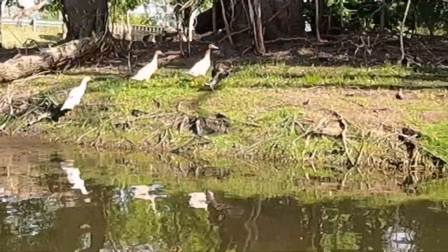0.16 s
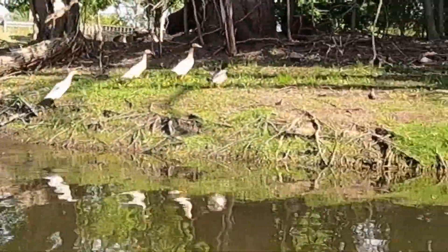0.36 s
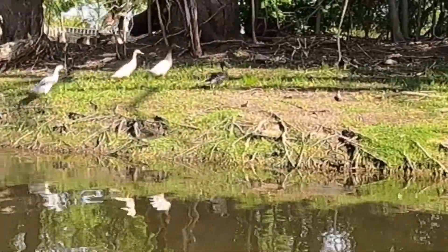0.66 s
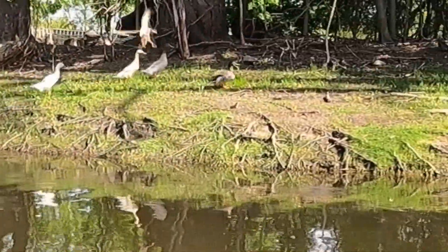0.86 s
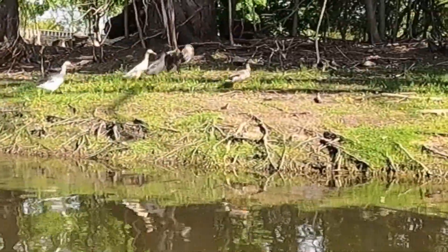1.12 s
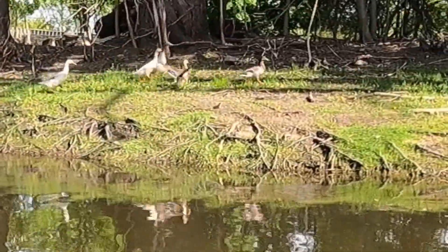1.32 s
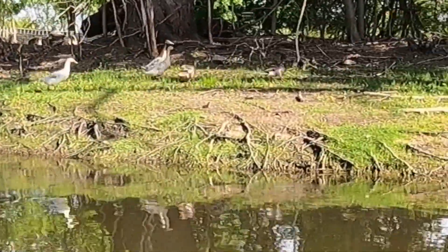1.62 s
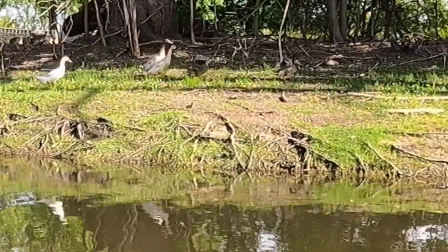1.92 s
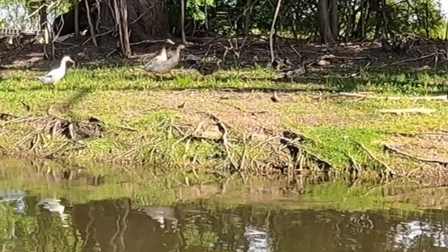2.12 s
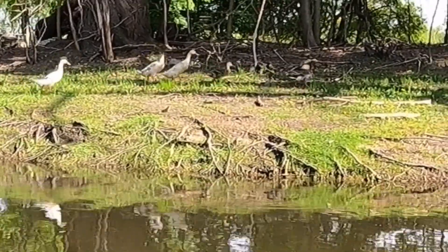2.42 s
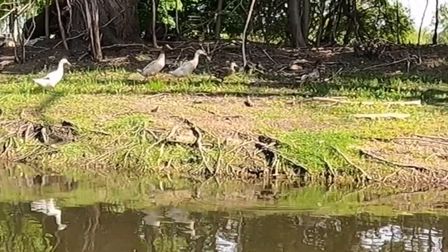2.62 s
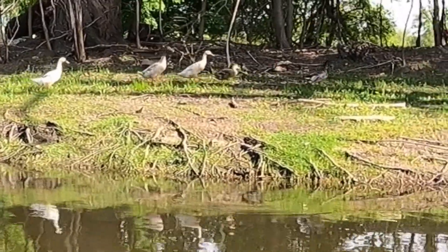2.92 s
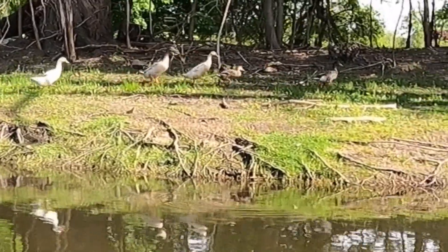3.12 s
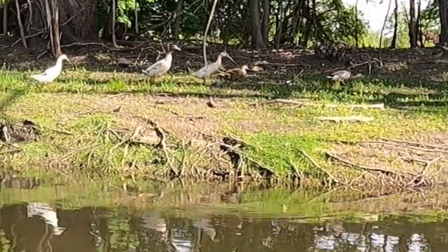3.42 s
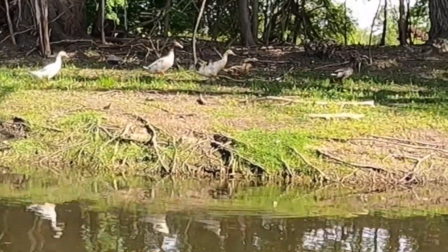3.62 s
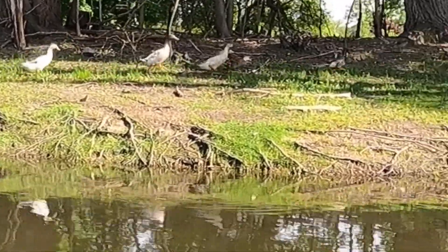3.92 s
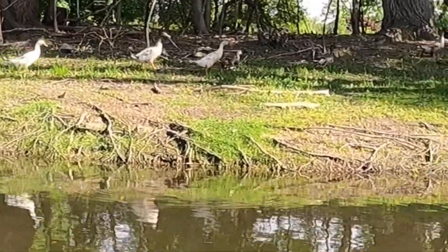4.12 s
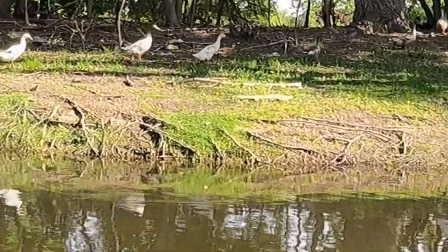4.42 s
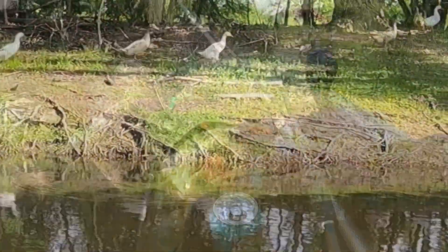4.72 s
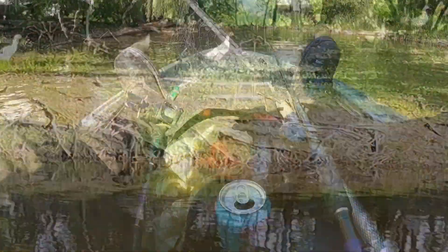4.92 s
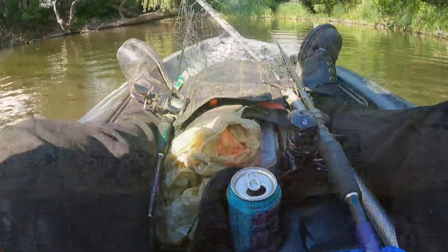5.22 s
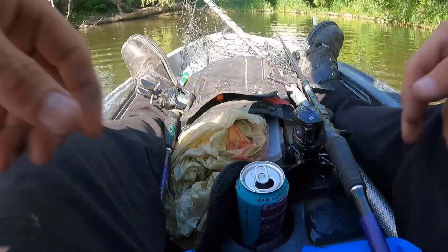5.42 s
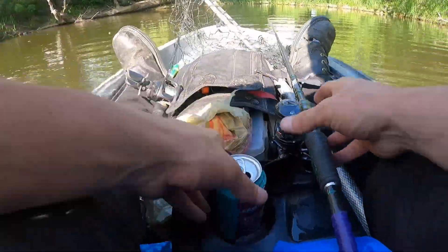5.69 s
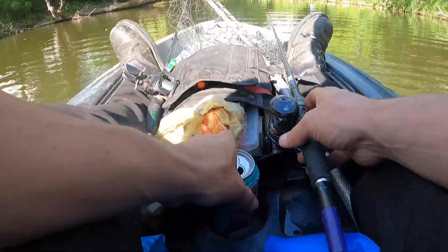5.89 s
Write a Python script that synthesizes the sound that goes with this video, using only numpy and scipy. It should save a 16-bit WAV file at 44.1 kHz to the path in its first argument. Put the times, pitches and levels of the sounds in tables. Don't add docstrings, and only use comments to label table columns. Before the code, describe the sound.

Slow raspy duck calls and soft quacks over low wind and a distant engine, giving way to hollow hull knocks and handling noises in a small boat.

```python
import sys
import numpy as np
from scipy import signal
from scipy.fft import rfft, irfft
from scipy.io import wavfile
from scipy.ndimage import uniform_filter1d

SR = 44100
rng = np.random.default_rng(int(sys.argv[2]) if len(sys.argv) > 2 else 0)


def how_loud(loudness_db):
    steps = np.asarray(loudness_db, float) / 20
    return 10 ** steps


def file_out(sig):
    cols = np.atleast_2d(sig).T
    lim = np.clip(cols, -1, 1)
    pcm = np.round(lim * 32767).astype(np.int16)
    wavfile.write(sys.argv[1], SR, pcm)


N = 266995

FADE_START_S, FADE_END_S = 4.37, 5.08
HANDS_S = 5.14

# (frequency [Hz], level [dB])
BANK_ENGINE = [(42, -48), (54, -51.5), (83, -42.5), (115, -57.5), (126, -53), (146, -57), (168, -61)]
# (frequency [Hz], level [dB])
BOAT_ENGINE = [(38, -40.5), (77, -42.5), (180, -51.5), (202, -49)]
# (time [s], level [dB])
GUSTS = [(0.0, -41), (0.85, -44.5), (1.21, -40.5), (1.79, -48), (2.52, -45.5), (3.6, -48), (4.45, -49),
         (4.65, -42), (4.94, -40), (5.11, -44.5), (5.224, -40), (5.63, -39.5), (6.054, -34.5)]
# (time [s], level [dB])
TREE_BREEZE = [(0.0, 5.5), (0.5, 0.5), (1.35, -1), (2.2, -3.5), (2.9, -0.5), (3.3, 0), (3.65, -2.5),
               (4.1, -2.5), (4.6, 1.5), (5.1, 0.5), (5.27, 3), (5.45, 0.5), (5.6, 3.5), (5.8, -0.5),
               (6.05, 1)]
# (frequency [Hz], density [dB per Hz])
BANK_SPECTRUM = [(12, -50), (20, -19), (60, -1), (85, -7), (106, -6), (324, -19.5), (425, -29.5),
                 (1490, -26.5), (2070, -32.5), (2800, -31.5), (3300, -38), (6350, -44), (8110, -53.5),
                 (10400, -54), (13000, -64.5), (15500, -84)]
# (frequency [Hz], density [dB per Hz])
BOAT_SPECTRUM = [(12, -26), (20, -12.5), (80, 1), (103, -14), (193, -6.5), (307, -15), (403, -19),
                 (590, -26), (1530, -28.5), (3680, -37.5), (6010, -40.5), (7680, -46.5), (13000, -58.5),
                 (15500, -84)]
# (frequency [Hz], density [dB per Hz])
CLOTH_SPECTRUM = [(1470, -49), (2500, -8), (3160, -0.5), (3800, -29), (4410, -1.5), (6070, 1), (12100, -25),
                  (15000, -46)]
# (loudest time [s], level [dB])
CLOTH_STROKES = [
    (5.16, -62),
    (5.27, -60),
    (5.586, -45),
    (5.69, -63),
    (5.772, -38.5),
    (6.06, -60),
]
# (frequency [Hz], correlation [0-1])
PORT_LIKENESS = [(25, 0.95), (60, 0.99), (140, 0.99), (260, 0.97), (520, 0.85), (1520, 0.75), (4480, 0.77),
                 (13200, 0.67)]
# (frequency [Hz], left lead [rad], left minus right [dB])
PORT_DIFFERENCE = [(100, -0.1, -0.2), (800, -0.013, 1.5), (1860, -0.34, 1), (2900, -1.39, 1),
                   (4200, -0.86, -1), (4400, -0.012, -1.5), (9300, -0.61, 3), (12900, -1.6, 3.5)]

# (time [s], peak [dB], ring [Hz], left minus right [dB], length [ms])
TWIG_TICKS = [(0.084, -45, 5360, -4, 5.7), (0.186, -45, 5600, 0.0, 2.6), (0.342, -45.5, 6040, -1, 3.6),
              (0.434, -35, 6330, 1.0, 1.6), (0.5507, -44, 5570, -1, 1.67), (0.718, -48, 6690, 3, 16),
              (0.724, -43.5, 3700, -4, 10), (2.884, -48, 11800, -2, 1.6), (1.3882, -53, 5200, -0.5, 2.4),
              (1.4093, -45, 6140, -2, 1.8), (2.065, -47, 4560, 4, 2), (2.3111, -45, 6300, 2, 1.3),
              (2.724, -39, 5230, -1, 2.4), (2.905, -43.5, 6360, 4, 2), (2.9926, -45, 5330, -1, 2.5),
              (3.14, -47.5, 3200, 4, 20), (3.171, -47, 3600, 6, 5.2), (3.3204, -50, 4950, -2, 2.1),
              (3.712, -42, 4870, -3, 1.2), (3.824, -36.5, 6740, -1, 1.2), (4.203, -40, 4540, -9, 1.5),
              (4.363, -31.5, 6000, -3, 1.44), (4.423, -40.5, 5600, 0, 1.9)]
# (time [s], peak [dB], ring [Hz])
LEAF_DRIPS = [(0.2404, -49, 7100), (0.2778, -44, 5330), (0.447, -46, 7500), (0.5786, -56, 7000),
              (0.6694, -58, 8500), (0.8355, -55, 8000), (1.3493, -58, 7000), (1.6167, -57, 8000),
              (1.6327, -51, 8100), (1.6576, -53, 8100), (2.3225, -51, 5200), (2.4339, -58, 8000),
              (2.5237, -60, 8000), (2.9622, -53, 8000), (3.0609, -55, 8000), (3.456, -45, 6500),
              (3.5279, -57, 8000), (3.6341, -46, 7000), (3.7688, -49, 7360), (4.214, -48, 5000),
              (4.2807, -54, 9000), (4.473, -55, 9000), (4.54, -58, 9000), (4.591, -62, 8000),
              (4.6344, -53, 9000), (4.695, -52, 10000), (5.4391, -46, 4660), (5.708, -37, 8800),
              (5.988, -42, 10500)]
# (time [s], peak [dB], ring [Hz], left minus right [dB], length [ms])
TACKLE_CLICKS = [
    (5.235, -41, 4400, -11, 5.6),
    (5.264, -38, 5530, -9, 1.7),
    (5.651, -35, 5770, -6, 2),
    (5.668, -22, 6870, 0, 1.2),
    (5.925, -35, 4640, -2, 2.3),
    (5.9446, -42, 5780, -1, 1.47),
    (5.98, -38, 4870, 4, 1.2),
    (5.9994, -39.5, 5000, 2.0, 2.5),
    (5.687, -34, 1460, -7, 1.6),
    (5.9243, -25.5, 1610, -3, 1.7),
]
# (time [s], peak [dB], swing [Hz])
HULL_BLOWS = [
    (2.067, -22, 154),
    (4.683, -20, 83),
    (4.939, -42, 69.7),
    (5.236, -11.5, 77),
    (5.518, -21, 59),
    (5.547, -17, 62.7),
    (5.566, -7.5, 72),
]
# (time [s], peak [dB], ring [Hz])
GEAR_KNOCKS = [(4.851, -42, 258), (4.95, -36, 221), (4.96, -43, 555), (5.055, -38, 307),
               (5.191, -36.5, 244), (5.245, -39, 422), (5.272, -40, 416), (5.328, -38, 400),
               (5.368, -43, 380), (5.49, -39, 414), (5.538, -36, 400), (5.736, -38, 297), (5.858, -43, 230),
               (5.911, -37, 249)]

# (start [s], length [s], centre [Hz],
# level [dB], loudest at [share of length])
CHATTER = [(0.2, 0.095, 2970, -54, 0.32), (0.356, .04, 3900, -60, .4), (0.362, .03, 5500, -65, .4),
           (0.455, 0.046, 1050, -50, .4), (0.99, .04, 3320, -50, .5), (0.841, .2, 3930, -52, 0.35),
           (1.46, .22, 4220, -53, 0.38), (1.519, 0.22, 2700, -53, .3), (2.255, 0.035, 3900, -65, .5),
           (2.338, 0.15, 2700, -53.5, 0.62), (2.43, 0.18, 2580, -53, 0.27), (2.79, 0.12, 4400, -58, .4),
           (3.391, 0.058, 4100, -57.5, 0.45), (3.828, 0.33, 3120, -53.5, .4), (4.24, .1, 10000, -71.5, .55),
           (4.27, .06, 6940, -64.5, .5)]
# (start [s], length [s], centre [Hz], level [dB], loudest at [share of length])
WARBLES = [(0.845, 0.2, 3650, -49.5, 0.4), (1.0, 0.25, 3720, -53, 0.15), (1.074, 0.17, 2390, -52.5, 0.58),
           (0.831, 0.14, 4180, -51.5, .4), (1.499, 0.14, 4200, -58, 0.31), (1.47, 0.22, 3800, -65, 0.44),
           (1.8, 0.38, 4226, -48, 0.36), (2.238, 0.26, 3930, -66.5, 0.42), (2.714, 0.24, 3940, -58, 0.41),
           (2.761, 0.23, 4460, -64, 0.33), (2.9, 0.12, 6400, -63, 0.26), (3.826, 0.34, 2930, -47.5, 0.4),
           (4.332, 0.27, 3584, -49, 0.41)]
# (start [s], length [s], pitch [Hz], level [dB], loudest
SWELLING_PEEPS = [(0.354, 0.21, 2000, -49.5, 0.047), (1.857, 0.2, 6340, -67, .13),
                  (2.295, 0.33, 2930, -51, 0.067), (2.778, 0.21, 3020, -46, .04),
                  (2.985, 0.15, 5090, -63.5, 0.76), (3.762, 0.28, 7300, -68, .05),
                  (4.084, 0.16, 1923, -53.5, 0.37), (4.734, 0.18, 3913, -49.5, 0.49),
                  (1.259, 0.038, 695, -52.5, 0.35), (3.545, 0.039, 688, -55, 0.41),
                  (4.691, 0.028, 565, -46, 0.46)]
# (start [s], length [s], from [Hz], to [Hz], level [dB])
SLURRED_WHISTLES = [(0.255, 0.071, 2480, 2364, -50), (0.325, .33, 2390, 2325, -53),
                    (0.777, 0.2, 4519, 4414, -55.5), (0.802, 0.049, 4383, 3470, -51),
                    (1.442, 0.03, 3600, 4030, -56.5), (1.453, 0.016, 4050, 5000, -53),
                    (1.504, 0.21, 2950, 2870, -53.5), (2.326, 0.0545, 2794, 2425, -50),
                    (3.315, 0.0614, 2446, 2710, -51.5), (3.357, 0.16, 2740, 2646, -49.5),
                    (3.329, 0.12, 1660, 1703, -56)]

# (start [s], length [s], effort [dB], pulse rate [Hz], throat [Hz])
LOW_QUACKS = [
    (0.498, 0.027, -43.5, 152, 1120),
    (0.681, 0.014, -42.5, 136, 1120),
    (1.055, 0.045, -43.5, 145, 1150),
    (1.367, 0.061, -42.5, 150, 1105),
    (2.594, 0.026, -48.5, 172, 930),
    (2.748, 0.037, -44, 200, 1110),
    (2.95, 0.02, -60, 120, 800),
    (3.025, 0.033, -45, 153, 1120),
    (3.37, 0.072, -48, 172, 900),
]
# (frequency [Hz], width [Hz], level [dB])
QUACK_RESONANCES = [(400, 130, -13.5), (673, 210, -5.5), (1345, 290, -6.5), (3800, 1200, -23.5)]
# (start [s], length [s], effort [dB], bill opening [dB])
SHORT_GRUNTS = [(0.0, 0.05, -42.5, -26), (0.621, 0.07, -49, -32), (0.709, 0.043, -46, -16),
                (1.299, 0.081, -46.5, -20), (1.518, 0.14, -42, -19), (2.172, 0.073, -44, -26),
                (2.4, 0.097, -39.5, -10.5), (3.006, 0.066, -41, -16.5), (3.218, 0.093, -38, -16),
                (3.943, 0.088, -37.5, -19), (4.172, 0.092, -37.5, -18.5), (4.805, 0.066, -48, -28),
                (5.026, 0.075, -49.5, -27)]
# (frequency [Hz], width [Hz], level [dB])
THROAT_RESONANCES = [(1771, 160, -2.5), (2100, 308, 1.5)]
# (frequency [Hz], width [Hz], level [dB])
BILL_RESONANCES = [(2784, 214, 3), (4580, 300, -19.5), (5370, 1000, -14), (6570, 580, -24)]
# (time [s], effort [dB], bill opening [dB], throat [Hz])
OTHER_DRAKE = [
    (0.045, -52, -4, 1900),
    (0.09, -48.5, -8.5, 2210),
    (0.18, -43, -8, 2330),
    (0.2, -46.5, -5, 2410),
    (0.24, -66, -15, 2450),
]
# (start [s], length [s], effort [dB], loudest at [share of length], throat [Hz])
LONG_RASPS = [
    (0.736, 0.34, -40.5, 0.41, 2103),
    (1.618, 0.31, -37, 0.51, 2095),
    (2.537, 0.32, -38.5, 0.43, 2100),
    (3.425, 0.37, -38, 0.46, 2125),
    (4.32, 0.36, -41, 0.62, 2134),
]


def evened(x):
    return x / np.sqrt(np.mean(x ** 2) + 1e-20)


def smooth_noise(count, window):
    return evened(uniform_filter1d(rng.standard_normal(count), window))


def read(points, hz):
    f, value = np.transpose(points)
    return np.interp(np.log(hz + 1), np.log(f + 1), value)


def columns(rows):
    s, *cols = np.transpose(rows)
    t = np.arange(s[0], s[-1], 1 / SR)
    return (t, *(np.interp(t, s, c) for c in cols))


def add(mix, s, sound):
    part = mix[..., round(s * SR):][..., :sound.shape[-1]]
    part += sound[..., :part.shape[-1]]


def panned(db):
    return how_loud([[db / 2], [-db / 2]])


def resonate(x, hz, width):
    turn = np.exp(2j * np.pi * np.cumsum(hz * np.ones(len(x))) / SR)
    r = np.exp(-np.pi * width / SR)
    return 2 * (turn * signal.lfilter([(1 - r) ** 2], [1, -2 * r, r * r], x / turn)).real


def boat_share(t):
    return np.clip((t - FADE_START_S) / (FADE_END_S - FADE_START_S), 0, 1)


def hum(lines):
    out = 0
    for hz, db in lines:
        sway, drift = (evened(resonate(rng.standard_normal(N), 1e-3, 6.77)) for _ in range(2))
        tone = np.sin(2 * np.pi * np.cumsum(hz + 1.278 * drift) / SR)
        out = out + how_loud(db + 2.5 + 2.3 * sway) * tone
    return out


def engine(lines):
    return hum(lines) + how_loud(-19.5) * hum(lines) * np.array([[1], [-1]])


def rustle_db(t):
    rise_db_s, fall_db_s, hands_db = 242, 120, -58
    power = how_loud(2 * hands_db) * (t > HANDS_S) + 1e-14
    for s, db in CLOTH_STROKES:
        power = power + how_loud(2 * (db - np.maximum(rise_db_s * (s - t), fall_db_s * (t - s))))
    return 10 * np.log10(power)


def air():
    frames, hz = N // 256 + 5, np.fft.rfftfreq(1024, 1 / SR)
    t = np.arange(frames) * 256 / SR
    a, b, c, d, patches = rng.standard_normal((5, len(hz), frames))
    patches = evened(uniform_filter1d(uniform_filter1d(patches, 12, 0), 10, 1))
    flicker = smooth_noise(frames, 3) * np.clip(hz / 8000, 0, 1)[:, None]
    boat = boat_share(t)
    shape = how_loud(read(BANK_SPECTRUM, hz)[:, None] * (1 - boat) + read(BOAT_SPECTRUM, hz)[:, None] * boat)

    def gain_db(db, lo, hi, form):
        return db - 10 * np.log10((form[(hz > lo) & (hz < hi)] ** 2).sum(0))

    near = np.clip((t - FADE_START_S) / (HANDS_S - FADE_START_S), 0, 1) ** 3
    breeze_db = np.interp(t, *np.transpose(TREE_BREEZE))
    wash_db = -56 + 9 * near + breeze_db
    leaf_db = -78.5 - 3 * near + 0.89 * breeze_db
    cloth_db = rustle_db(t)
    hiss_db = 10 * np.log10(how_loud(2 * leaf_db) + how_loud(2 * (cloth_db - 18.5)))
    gust = gain_db(np.interp(t, *np.transpose(GUSTS)), 95, 330, shape)
    wash = gain_db(wash_db, 350, 1360, shape)
    hiss = gain_db(hiss_db, 8570, 11300, shape)
    low = 1 / (1 + (hz / 330) ** 4)[:, None]
    high = 1 / (1 + (4000 / (hz + 1)) ** 4)[:, None]
    field = shape * how_loud(low * (gust - 2.5) + high * hiss + (1 - low - high) * wash)
    cloth = how_loud(read(CLOTH_SPECTRUM, hz))[:, None]
    field = np.hypot(field, cloth * how_loud(gain_db(cloth_db, 4800, 9000, cloth) - 8.5))
    same, left = read(PORT_LIKENESS, hz)[:, None], a + 1j * b
    z = np.array([left, same * left + np.sqrt(1 - same ** 2) * (c + 1j * d)])
    z *= field * how_loud(1.9 * patches + 2.53 * flicker + 1.0)
    return signal.istft(z, nperseg=1024, noverlap=768)[1][:, :N]


def crackle():
    t = np.arange(HANDS_S, N / SR, 1 / SR)
    snaps = (rng.random((2, len(t))) < 60 / SR) * rng.standard_normal((2, len(t)))
    bright = signal.lfilter(*signal.butter(2, (4000, 13000), "band", fs=SR), snaps)
    out = np.zeros((2, N))
    add(out, t[0], how_loud(rustle_db(t) - 20) * evened(bright))
    return out


def ticks():
    out, t = np.zeros((2, N)), np.arange(1500) / SR
    bright = signal.butter(2, (3500, 12500), "band", fs=SR)
    drips = [(*drip, -1, 1.5) for drip in LEAF_DRIPS]
    for s, db, hz, pan_db, ms in [*TWIG_TICKS, *TACKLE_CLICKS, *drips]:
        noise = rng.standard_normal(len(t))
        burst = evened(resonate(noise, hz, 1900)) + 0.32 * signal.lfilter(*bright, noise)
        envelope = np.exp(-1000 * t / max(ms, .3)) * np.tanh(t / 0.00041)
        add(out, s, how_loud(db - 6) * burst * envelope * panned(pan_db))
    return out


def hull():
    out, t = np.zeros((2, N)), np.arange(SR // 5) / SR
    for s, db, hz in HULL_BLOWS:
        add(out, s, how_loud(db - 2.5) * np.sin(2 * np.pi * hz * t) * t * hz * np.exp(1 - 2.33 * t * hz))
    for s, db, hz in GEAR_KNOCKS:
        swing = t * hz / 1.7
        add(out, s, how_loud(db) * np.sin(2 * np.pi * hz * t) * swing * np.exp(1 - swing))
    return out


def wood(x):
    t = np.arange(SR // 3) / SR
    tail = rng.standard_normal((2, len(t))) * how_loud(-60 * t / 0.26) * (t > .004)
    return signal.fftconvolve(x, tail / np.linalg.norm(tail[0]), axes=1)[:, :N]


def calls(voice, rule, table, pan_db):
    out = np.zeros(N)
    for row in table:
        add(out, *voice(rule(*row)))
    return out * panned(pan_db)


def swell(start, length, hz, db, share):
    return np.c_[start + length * np.array([0, share, 1]), [hz] * 3, db + np.array([-14, 0, -22.5])]


def held(start, length, db, attack_s, release_s, edge_db):
    s = start + np.array([0, attack_s, (length + attack_s - release_s) / 2, length - release_s, length])
    return s, db + edge_db * np.array([1, 0, 0, 0, 1])


def slur(start, length, from_hz, to_hz, db):
    s, level_db = held(start, length, db, attack_s=0.012, release_s=0.012, edge_db=-3)
    done = np.interp((s - start) / length, [0, .5, 1], [0, .8, 1])
    return np.c_[s, from_hz + (to_hz - from_hz) * done, level_db]


def buzz(rows):
    t, hz, level_db = columns(rows)
    breath = evened(resonate(rng.standard_normal(len(t)), hz, 300 + 0.085 * hz.mean()))
    return t[0], how_loud(level_db) * breath * signal.windows.tukey(len(t), .15)


def trill(rows):
    t, hz, level_db = columns(rows)
    hz = hz * (1 + .008 * smooth_noise(len(t), 2500))
    line, wide = (evened(resonate(rng.standard_normal(len(t)), hz, width)) for width in (70, 480))
    return t[0], how_loud(level_db) * evened(line + .9 * wide) * signal.windows.tukey(len(t), .15)


def whistle(rows):
    t, hz, level_db = columns(rows)
    waver = smooth_noise(len(t), 900)
    hz = hz * (1 + .005 * waver)
    tone = how_loud(2.4 * waver[::-1]) * np.sqrt(2) * np.sin(2 * np.pi * np.cumsum(hz) / SR)
    blur = evened(resonate(rng.standard_normal(len(t)), hz, 137))
    return t[0], how_loud(level_db) * evened(tone + .75 * blur) * signal.windows.tukey(len(t), .15)


def tract(x, modes):
    return sum(how_loud(db) * evened(resonate(x, hz, width)) for hz, width, db in modes)


def pulses(rate, jitter, uneven_db):
    wander = smooth_noise(len(rate), 300)
    turns = np.cumsum(rate * (1 + jitter * wander)) / SR + .8
    size = how_loud(uneven_db * rng.standard_normal(200))[turns.astype(int)]
    clicks = np.diff(np.floor(turns), prepend=0.)
    puffs = np.exp(-(turns % 1) / .3) * rng.standard_normal(len(rate))
    return size * evened(clicks), size * evened(puffs)


def short_quack(start, length, db, rate, hz):
    s, effort_db = held(start, length, db, attack_s=0.0093, release_s=0.0046, edge_db=-2.5)
    return np.c_[s, effort_db, rate + 0 * s, hz + 0 * s]


def quack(rows):
    t, effort_db, rate, throat_hz = columns(rows)
    clicks, puffs = pulses(rate, jitter=.02, uneven_db=1.5)
    drive = clicks + .35 * puffs
    soft = signal.lfilter(*signal.butter(2, (270, 1900), "band", fs=SR), drive)
    voice = evened(resonate(soft, throat_hz, 370))
    voice = voice + tract(soft, QUACK_RESONANCES[:3]) + tract(drive, QUACK_RESONANCES[3:])
    return t[0], how_loud(effort_db) * evened(voice) * signal.windows.tukey(len(t), .45)


def grunt(start, length, db, bill_db):
    peak, hold = .42, 0.24
    s = start + length * np.array([0, peak - hold / 2, peak + hold / 2, 1])
    effort_db = db - 2 + np.array([-15.5, 0, 0, -22.5])
    return np.c_[s, effort_db, [bill_db] * 4, (2120, 2020, 2080, 2080)]


def long_rasp(start, length, db, share, hz):
    release_s, stop_s, throat_rise_hz = 0.053, 0.015, 180
    cut = start + length - release_s
    s = np.array([start, start + share * length, cut, cut + stop_s, start + length])
    effort_db = db + np.array([-12, 0, -4.5, -12, -16.5])
    bill_db = (-16, -10, -7, -22.5, -22.5)
    return np.c_[s, effort_db, bill_db, hz + throat_rise_hz * (s - s[1]) / length]


def rasp(rows, rough=.42, jitter=.04):
    t, effort_db, bill_db, throat_hz = columns(rows)
    since = t - t[0]
    clicks, puffs = pulses(112 - 30 * np.exp(-(since / .14) ** 2), jitter, uneven_db=1.1)
    from_hz, to_hz, slide_s = 1244, 3155, 0.00579
    u = np.arange(0, slide_s, 1 / SR)
    slide = signal.chirp(u, from_hz, slide_s, to_hz) * signal.windows.tukey(len(u), .5)
    slid = signal.fftconvolve(clicks + rough * puffs, slide, "same")
    bill_db = np.clip(bill_db, -30, -2)
    tremble = .028 * smooth_noise(len(t), 400)
    stretch = throat_hz / 2100 + 0.00088 * (bill_db + 8.0) + tremble
    (low_hz, low_width, low_db), (hz, width, db) = THROAT_RESONANCES
    low = evened(resonate(slid, low_hz * (1 - tremble), low_width))
    throat = how_loud(low_db - .5 * (bill_db + 18.0)) * low + how_loud(db) * evened(resonate(slid, hz * stretch, width))
    lift = stretch - tremble + 0.1 * (since - .15)
    opening = 1 - .1 * np.exp(-since / .1)
    bill = tract(slid, [(f * stretch * opening, w, g) for f, w, g in BILL_RESONANCES[:1]])
    bill = bill + tract(puffs + .1 * clicks, [(f * lift, w, g) for f, w, g in BILL_RESONANCES[1:]])
    voice = evened(throat) + how_loud(bill_db) * bill
    return t[0], how_loud(effort_db) * voice * signal.windows.tukey(len(t), .15)


def hoarse(rows):
    return rasp(rows, rough=.65, jitter=.08)


def scene():
    boat = boat_share(np.arange(N) / SR)
    background = air() + (1 - boat) * engine(BANK_ENGINE) + boat * engine(BOAT_ENGINE)
    hits = ticks() + hull() + crackle()
    birds = calls(buzz, swell, CHATTER, .2) + calls(trill, swell, WARBLES, -.3)
    birds += calls(whistle, swell, SWELLING_PEEPS, .3) + calls(whistle, slur, SLURRED_WHISTLES, 0.32)
    birds += calls(quack, short_quack, LOW_QUACKS, 0.93) + calls(hoarse, grunt, SHORT_GRUNTS, 0.46)
    birds += calls(rasp, lambda *points: points, [OTHER_DRAKE], 0.26)
    birds += calls(rasp, long_rasp, LONG_RASPS, 0.16)
    return how_loud(2.5) * birds + how_loud(-6.5) * wood(birds + hits) + hits + background


def roll_off(x):
    return signal.sosfilt(signal.butter(12, 15000, fs=SR, output="sos"), x)


def record(dry):
    hz = np.fft.rfftfreq(N, 1 / SR)
    at, lead, tilt_db = np.transpose(PORT_DIFFERENCE)
    half = np.exp(.5j * read(np.c_[at, lead], hz)) * how_loud(read(np.c_[at, tilt_db], hz) / 2)
    mix = irfft(rfft(dry) * np.array([half, 1 / half]), N)
    return roll_off(mix)


dry = scene()
out = record(dry)
file_out(out)
```